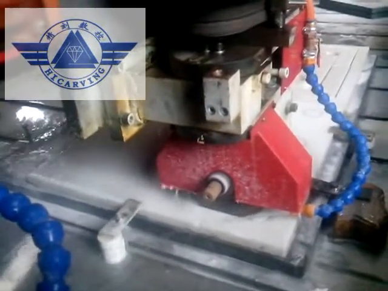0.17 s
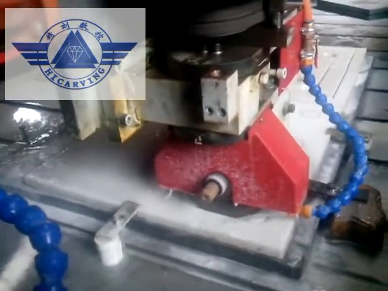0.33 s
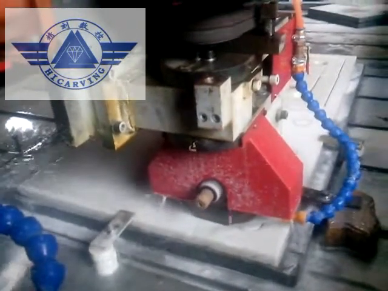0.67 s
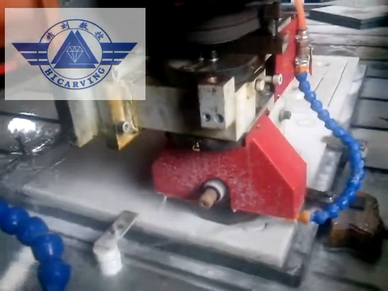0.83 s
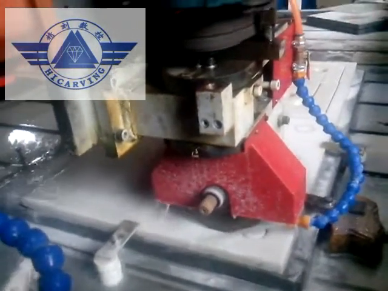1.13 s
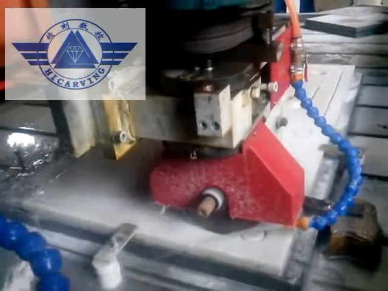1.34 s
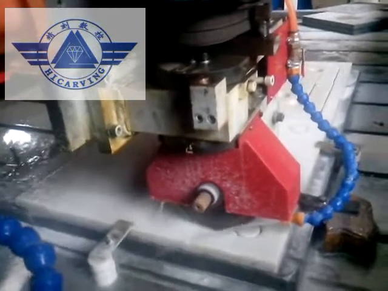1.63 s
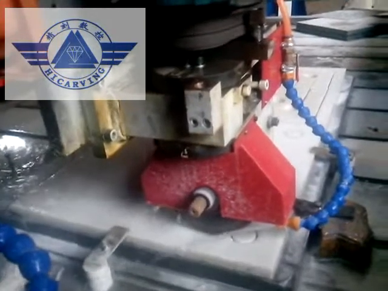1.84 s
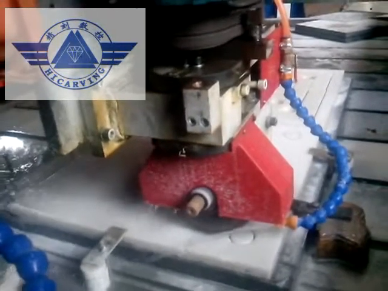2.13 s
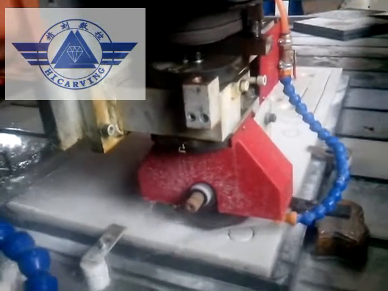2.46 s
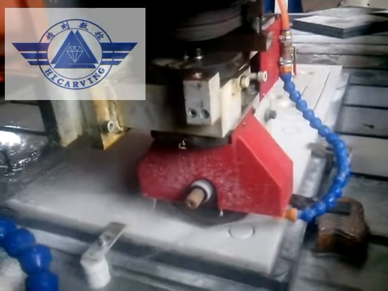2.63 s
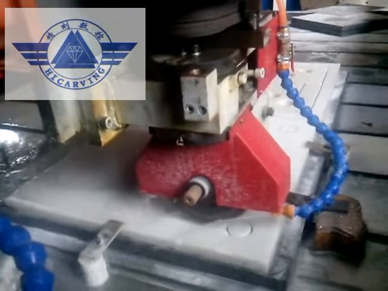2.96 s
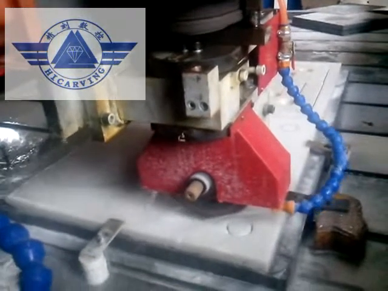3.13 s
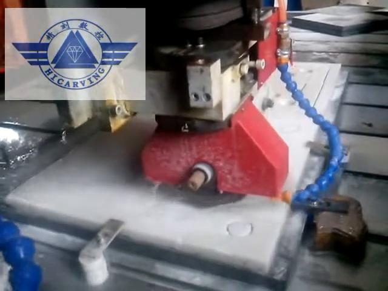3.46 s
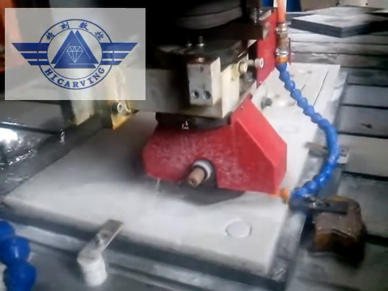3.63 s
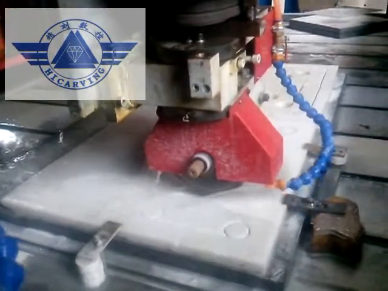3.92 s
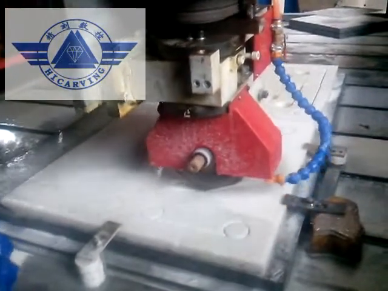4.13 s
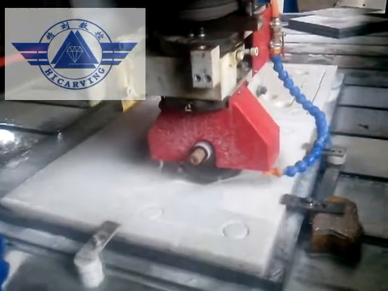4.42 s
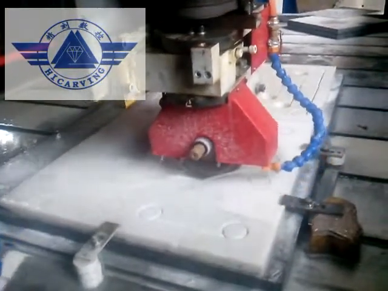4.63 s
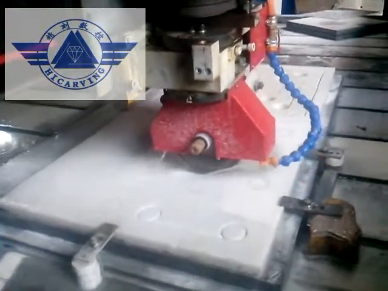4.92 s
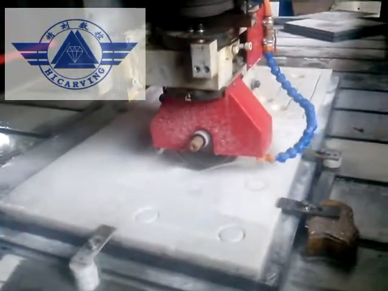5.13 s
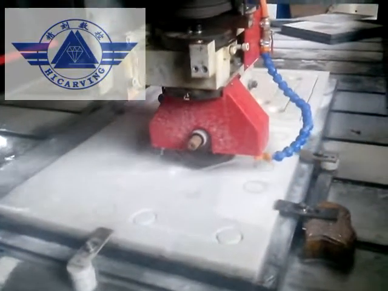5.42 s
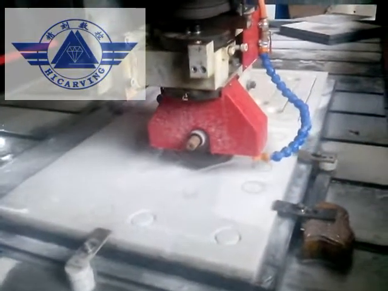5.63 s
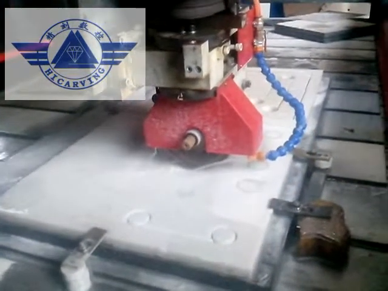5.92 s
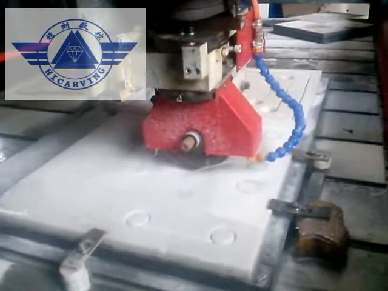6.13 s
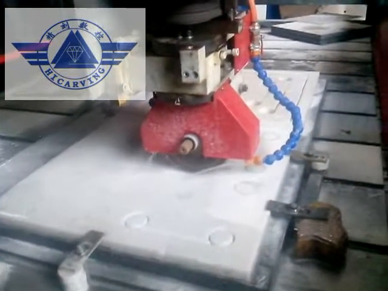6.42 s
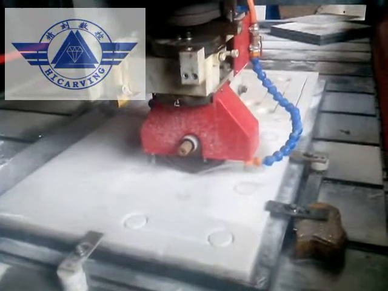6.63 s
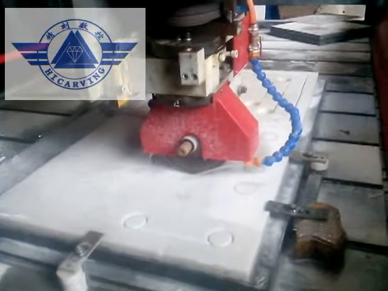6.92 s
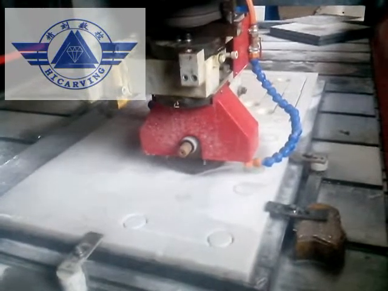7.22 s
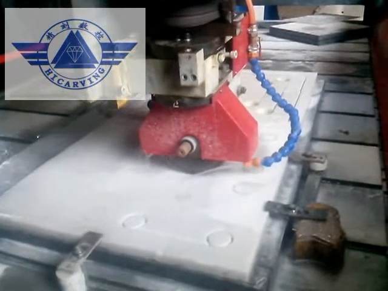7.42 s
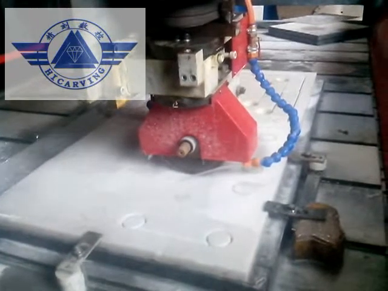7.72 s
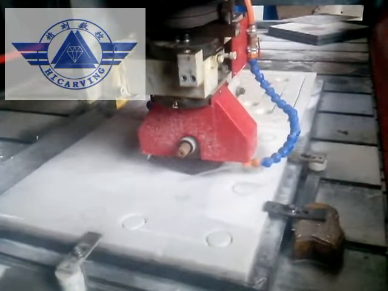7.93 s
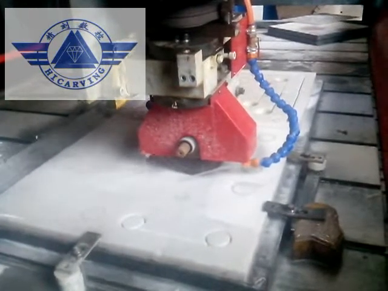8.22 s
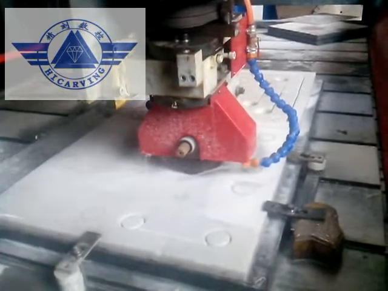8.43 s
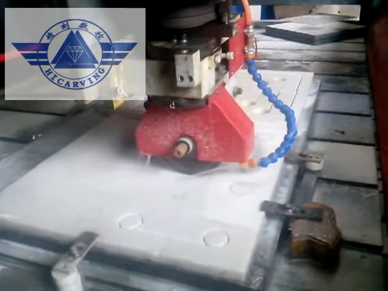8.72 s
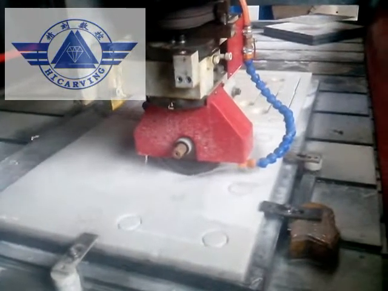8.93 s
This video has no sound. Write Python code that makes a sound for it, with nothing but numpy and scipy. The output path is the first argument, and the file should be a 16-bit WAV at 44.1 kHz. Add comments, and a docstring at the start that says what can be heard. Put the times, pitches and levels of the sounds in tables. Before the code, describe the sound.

In a workshop, a water-cooled circular saw blade rubs its kerf with bright, ringing scrapes about twenty-two times a second, screeching thinly. It thins out, then bites into a stone slab with a dense, rough grinding roar that grows brighter and more ringing, with chirps, snags and squeals. A few hard knocks end the cut and the loud pulsed scraping returns. Close, dry, overloaded microphone, centred.

```python
"""A blade scrapes and rings once a turn, then roars densely in stone, squeals and chirps, knocks hard and rubs again.
It is a water-cooled circular saw on a stone slab in a workshop; it runs free for a moment before it bites.
Grit and friction are noise, shaped by the turning rim, that drives the resonances of blade and slab;
squeals, screeches, whistles and whines are wavering tones; snags, knocks and chips are short bursts of noise;
water spray and a low hum in short spells are filtered noise behind them."""
import sys
import numpy as np
from scipy import signal
from scipy.fft import rfft, irfft
from scipy.io import wavfile
from scipy.ndimage import uniform_filter1d, map_coordinates

SR = 44100
rng = np.random.default_rng(int(sys.argv[2]) if len(sys.argv) > 2 else 0)


def master(y):
    """Save y as 16-bit WAV."""
    cut = np.clip(np.atleast_2d(y).T, -1, 1)
    pcm = np.round(cut * 32767)  # scale
    wavfile.write(sys.argv[1], SR, pcm.astype(np.int16))


N = 400428
TIME = np.arange(N) / SR
TAPS = 8192
HZ = np.fft.rfftfreq(TAPS, 1 / SR)

# the blade's rotation: turns a second, and a time at which a turn begins
TURN_HZ, TURN_FROM_S = 22.1, .0649
# the cut: the blade bites (with this time constant), sinks to full depth, leaves the stone
BITE_S, BITE_TIME_CONSTANT_S, SINK_FROM_S, SINK_TO_S, LEAVE_S = 1.832, 0.36, 2.98, 4.82, 7.84

# The feed surges at a steady rate: surges a second, and the time of one crest.
SURGE_RATE_HZ, SURGE_CREST_S = 2.82, 5.19
# Voices of the cut. Each holds: base level in dB biting in, base level in dB at full depth, swing with each
# surge in dB, gain when running free (negative inverts the wave), decay in dB per second after the cut.
RUMBLE = (-38, -36, 1.5, 0.07, 400)
GRIND = (-28.5, -25.5, 0.72, 0.12, 275.5)
RING = (-31.5, -25, 0, 0.23, 104)
HISS = (-35.5, -31, 0.5, -0.12, 128)


def cut_level(voice, depth):
    """Exponential onset: a voice builds as the blade bites, follows depth and feed, and decays on leaving."""
    early_db, deep_db, surge_db, free, fall_db_per_s = voice
    bite = 1 - np.exp(-np.maximum(TIME - BITE_S, 0) / BITE_TIME_CONSTANT_S)
    running_free = np.interp(TIME, [BITE_S - .25, BITE_S - .1], [0, free])
    surge = np.cos(2 * np.pi * SURGE_RATE_HZ * (TIME - SURGE_CREST_S))
    db = early_db + (deep_db - early_db) * depth + surge_db * surge
    db = db - fall_db_per_s * np.maximum(TIME - LEAVE_S, 0)
    return (bite + (1 - bite) * running_free) * amp(db)


# The ring keeps growing as the kerf lengthens, counted from full depth.
RING_GROWTH_DB_PER_S = 0.7
# Blade held in the cut, with slab and guard.
# Each row: frequency in Hz, half width in Hz, relative level in dB biting in, the same at full depth.
SLAB_MODES = [(146, 7.4, -12, -15), (222.3, 33, -7, -8), (301.2, 20, -0.5, -5.5), (383.4, 10, -3.5, -18.5),
              (526, 44, -10.5, -12.5), (590, 49, -3, -10), (712, 24, -14, -11.5), (925, 250, -10.5, -14),
              (955, 17, -0.5, -6), (1184, 62, -10, -16), (1417, 53, -7, -10.5), (1543, 38, -3, -10.5),
              (1686, 46, -6, -13.5), (1885, 196, -16, -11), (2024, 11, -2, -3), (2280, 120, -12.5, -14),
              (2490, 25, -3, -14.5), (2781, 111, -1.5, 1), (2896, 18, 4, 4.5), (3011, 62, -6.5, -4),
              (3230, 100, -12.5, -10), (3592, 38, -8, -8), (3910, 160, -12.5, -9), (4396, 125, -8.5, -2.5),
              (5030, 190, -9.5, -11.5), (5660, 180, -14, -16), (6040, 130, -23, -19),
              (6995, 120, -21.5, -24)]
# Broad colour of the cut: steep drop above 7 kHz, faint band near 9 kHz.
# Each row: frequency in Hz, spectrum level in dB on the scale of the slab modes.
CUT_COLOUR = [(20, -27.5), (65, -43), (110, -17), (500, -20), (6500, -20), (7300, -45.5), (7900, -77),
              (8500, -57.5), (9000, -40.5), (9700, -49), (10400, -66), (16000, -85)]
# Load on the blade while it works into the stone.
# Each row: time in seconds, change of rumble and grinding in dB.
LOAD = [(1.95, -0.5), (2.35, 2), (2.72, 0.5), (2.95, -2), (3.1, 0), (3.3, -2), (4.3, 0.5)]
# Hard patches in the stone add to the blade's ring.
# Each row: start in seconds, length in seconds, added ring in dB against the usual one.
HARD_PATCHES = [(2.42, .11, 3), (2.53, .2, -8), (7.31, .07, -2)]
# The loaded rim repeats its forces every turn.
# Each row: multiple of the turn rate, level in dB against the rumble.
ORDERS_OF_TURN = [(10, -12), (17, -13), (26, -10), (27, -7), (28, -8)]


def cutting(bite_at=0.15, bite=0.41, throb=0.26):
    """Forced vibration: grit crushing stone drives the held blade; the ring and hiss grow brighter with depth."""
    depth = np.interp(TIME, [SINK_FROM_S, SINK_TO_S], [0, 1])
    rumble, grind, rings, hiss = (cut_level(voice, depth) for voice in (RUMBLE, GRIND, RING, HISS))
    load_gain = amp(curves(LOAD)[0])
    rumble, grind = load_gain * rumble, load_gain * grind
    growth = amp(RING_GROWTH_DB_PER_S * np.maximum(TIME - SINK_TO_S, 0))
    rings = rings * growth * (1 + swells(HARD_PATCHES, edge=0.023))

    # the high spot bites once a turn
    spot = high_spot((TIME - TURN_FROM_S) * TURN_HZ - bite_at, rise=0.048, fall=0.049)
    load = (1 + throb * spot) * amp(.6 * wander(28) + .5 * wander(4))
    # fractures come in clumps
    crush = load * evened(patchy(patch_db=2.5, span_hz=125.0, life=0.11) * amp(2. * wander(410)))
    # now one mode is struck, now another
    chipped = load * patchy(patch_db=3.7, span_hz=110., life=.05)
    # larger chips ping the strong modes near 2.8 kHz
    chips = evened(chipped * (1 + bite * spot) * amp(2.2 * np.clip(wander(110), -2, 2)))

    early, late = (np.hypot(resonances(SLAB_MODES, axis=k), spectrum(CUT_COLOUR)) for k in range(2))
    voices = [(crush, zone(5, 444), rumble), (crush, zone(429, 2610), grind),
              (chips, zone(2500, 3570), rings), (crush, zone(3260, 20000), hiss)]
    out = np.zeros(N)
    for drive, band, level in voices:
        out += level * ((1 - depth) * ring(drive, band * early) + depth * ring(drive, band * late))
    for multiple, db in ORDERS_OF_TURN:
        phase = 2 * np.pi * multiple * TURN_HZ * TIME + .6 * wander(5)
        tone = np.sin(phase) * (1 + .5 * wander(8))
        out += rumble * amp(db) * evened(tone)
    return out


# The high spot bites extra hard and pings the modes near 2.8 kHz.
# Each row: time in seconds, relative level in dB.
PINGS = [(2.44, -15), (2.473, -12), (2.776, -14), (2.876, -15), (3.519, -14), (4.046, -13), (4.578, -9),
         (5.776, -10.5), (5.911, -6), (6.093, -8), (6.544, -5), (6.671, -9), (6.7705, -9), (7.0364, -8),
         (7.269, -24), (7.45, -17.5), (7.585, -9)]
# Lumps of stone break away with a dull crunch.
# Each row: time in seconds, relative level in dB.
CRUNCHES = [(2.774, -20), (2.872, -27.5), (6.665, -19)]


def chipping(ping_db=-4.0):
    """Impulse response: hard bites ring the held blade near 2.8 kHz; breaking lumps shake the slab as well."""
    ping_force = bursts(PINGS, rise=0.00094, decay=0.0069) * rng.standard_normal(N)
    pings = ring(ping_force, resonances(SLAB_MODES, axis=1) * zone(2590, 3180))
    crunch_force = bursts(CRUNCHES, rise=0.013, decay=0.015) * rng.standard_normal(N)
    crunches = ring(crunch_force, resonances(SLAB_MODES, axis=0) * zone(480, 4300))
    return amp(ping_db) * pings + crunches


# The three high spots of the rim. Each row: place in the turn, rise in turns, release in turns,
# creep of the place in turns per second.
SPOTS_BEFORE = [(.04, 0.12, 0.19, 0.04), (.45, 0.11, 0.27, .015), (.73, 0.052, 0.041, .005)]
SPOTS_AFTER = [(.062, 0.094, 0.15, -0.022), (.55, 0.073, 0.11, 0.045), (.745, .05, .06, .09)]
# The blade lifts before it bites, so its strokes shorten: from when, and the share of length left at the bite.
LIFT_S, LIFT_SHARE = 0.83, 0.78


def strokes_of_rim(after, second_db, third_db):
    """Periodic contact: each high spot presses on the kerf once a turn, with slight chance in time and force."""
    turns = (TIME - TURN_FROM_S) * TURN_HZ + 0.0064 * wander(28)
    age = TIME - after * LEAVE_S
    length = np.where(after, 1, np.interp(TIME, [LIFT_S, BITE_S], [1, LIFT_SHARE]))
    strokes = []
    for early, late, db in zip(SPOTS_BEFORE, SPOTS_AFTER, [0, second_db, third_db]):
        at, rise, fall, creep = (np.where(after, b, a) for a, b in zip(early, late))
        press = high_spot(turns - at - creep * age, rise * length, fall * length)
        strokes.append(amp(db + wander(43)) * press)
    return strokes


# Rubbing before and after the cut. Each row: time in seconds, base level of the ring in dB, base level of the
# low blade modes in dB, then second high spot, third high spot and steady contact in dB against the first spot.
RUB_BEFORE = [(0, -19, -24, -6, -19, -2), (.3, -16, -24, 0, -2, -27), (.42, -20, -28, -5.5, -12, -7),
              (.6, -15, -25.5, -2, -19, -21), (.8, -14, -22, 1.5, -13, -8), (.9, -15.5, -27.5, -10, 0, -6),
              (1.1, -16, -29.5, 2, 3, -9.5), (1.22, -16.5, -26.5, 4, 3, -10),
              (1.47, -17.5, -28.5, 3, -12, -18), (1.66, -21, -44, 2, -17, -29),
              (1.8, -39.5, -50, 1, 0, -10), (1.95, -46, -49, 2, 6, -5)]
RUB_AFTER = [(7.9, -22, -26.5, -31, -35, -36), (7.97, -19.5, -32.5, -19, -7, -20),
             (8.12, -20, -26, -4.5, 3, -10.5), (8.33, -20, -28, -10, -5, -12.5),
             (8.47, -16.5, -21.5, -9, -0.5, -13), (8.6, -15.5, -22.5, -1, 4.5, -16),
             (8.74, -18, -29, -14, 1, -4), (8.85, -16, -19.5, 2.5, 1.5, -14.5),
             (9.08, -14.5, -21.5, 1, 3, -7)]
# Turns on which the first high spot digs in harder.
# Each row: start in seconds, length in seconds, added force in dB against the usual one.
HARD_STROKES = [(.058, .016, -4), (.288, .014, 0), (.335, .013, 1), (.604, .016, -2), (.65, .014, -3),
                (1.257, .012, 2), (1.304, .012, -2), (1.395, .012, -2), (1.575, .014, -4),
                (8.026, .012, -1), (8.071, .014, 1)]
# Steel blade. Each row: frequency in Hz, half width in Hz, relative level in dB rubbing lightly,
# the same rubbing deeper, the same after the cut.
BLADE_MODES = [(1673, 34, -46, -33, -12.5), (1944, 59, -12.5, -9, -12.5), (2036, 100, -24, -36, -14),
               (2353, 49, -15.5, -18.5, -33), (2760, 450, -24, -30, -31), (2678, 23, -29, -26, -6),
               (2885, 110, -15, -9, -5.5), (3156, 32, -15, -11, -6), (3278, 30, -14, -7.5, 1.5),
               (3344, 57, -20, -25, -5.5), (3806, 20, -11.5, -14, -19), (3990, 130, -34, -23, -12.5),
               (4157, 61, -11.5, -23, -2), (4327, 103, -5, -8.5, -0.5), (4550, 76, -6, -5, -8),
               (4710, 42, 3.5, -7, -18), (4993, 63, 5, -2, 0), (5390, 70, -24, -8, -10.5),
               (5160, 85, 1.5, -10, -6.5), (5600, 51, -3, -2.5, -35), (5663, 51, -13, -2, 3.5),
               (5940, 89, -12, -1, -10), (5873, 88, 7.5, -6, -25), (6510, 72, -8, -2, -15),
               (6396, 43, -10, -6, -4.5), (6670, 39, -7, -15, -1), (6680, 36, -63, -20, -9)]
# Overall colour of the rubbing: steep drop above 7 kHz, faint band near 9.4 kHz.
# Each row: frequency in Hz, spectrum level in dB on the scale of the blade modes, before a small shift.
RUB_COLOUR = [(1000, -58.5), (6800, -19), (7300, -38), (7900, -80.5), (8700, -51.5), (9400, -29),
              (9800, -40), (10200, -47), (10800, -80), (16000, -74)]
# The contact slips deeper into the kerf and the ring changes colour.
SLIP_S, SLIP_TAKES_S = 0.81, 0.11


def rubbing(low_share=0.6):
    """Friction-driven modes: high spots scrape the kerf each turn, and the place of contact picks the modes."""
    ring_db, low_db, second_db, third_db, steady_db = curves(RUB_BEFORE + RUB_AFTER)
    after = TIME > (BITE_S + LEAVE_S) / 2  # the two rubs lie on either side of the cut
    first, second, third = strokes_of_rim(after, second_db, third_db)
    digging = 1 + swells(HARD_STROKES, edge=.004)
    lesser = np.sqrt(second ** 2 + third ** 2 + amp(steady_db) ** 2)

    # which column of BLADE_MODES rings; fractions blend two neighbours
    slipping = np.interp(TIME, [SLIP_S, SLIP_S + SLIP_TAKES_S, BITE_S], [0, 0.7, 1.4])
    place = np.where(after, 2, slipping)
    colours = [np.hypot(resonances(BLADE_MODES, axis=k), amp(shift_db) * spectrum(RUB_COLOUR))
               for k, shift_db in enumerate([0., 1.5, 1.5])]

    def scrape(force, band, singing=0):
        """Random excitation: friction noise under a contact force feeds the blade modes of one band."""
        force = force / np.sqrt(uniform_filter1d(force ** 2, round(2 * SR / TURN_HZ)))
        friction = patchy(patch_db=5., span_hz=160., life=.04, size=1024)  # feeds now one mode, now another
        drive = force * evened(friction * amp(2.4 * wander(520)))  # single grains catch
        rasp = sum(np.maximum(1 - abs(place - k), 0) * ring(drive, band * c) for k, c in enumerate(colours))
        return held(swayed(rasp) + singing * force, force)

    high = scrape(np.hypot(first * digging, lesser), zone(3330, 22000), singing=screech() * digging)
    # the low modes answer mostly the first spot
    low = scrape(np.hypot(first, low_share * lesser), zone(1460, 3680))
    contact = during(RUB_BEFORE) + during(RUB_AFTER)
    return contact * (amp(ring_db) * high + amp(low_db) * low + water_spray(first, low_db, after))


# The rubbing locks onto one high mode and screeches.
# Each row: start in seconds, length in seconds, frequency in Hz, level in dB against the ring.
SCREECHES = [(.27, 0.43, 5880, -4), (0.514, 0.26, 5020, -9), (.55, 0.36, 5250, -17), (0.622, .11, 6200, -9),
             (0.8, .45, 5830, -12), (1.374, 0.44, 6430, -3), (8.3, 1, 6480, -12)]


def screech():
    """Stick-slip oscillation: friction keeps single modes singing, each wavering in pitch."""
    return sum(chatter([(s, length, db)], hz, level_db=0., edge=.08, waver_hz=28., rough=.3)
               for s, length, hz, db in SCREECHES)


# Hard knocks of the blade against the stone. Each row: time in seconds, relative level in dB.
KNOCKS = [(7.757, -35), (7.799, -4.5), (7.845, -2), (7.891, -16)]


def knocks(rim_db=9.5):
    """Impact excitation: a high spot strikes the stone and the blade rings, most of all its rim near 4.2 kHz."""
    # rim modes: frequency in Hz, half width in Hz, relative level in dB
    rim = amp(rim_db) * resonances([(4150, 59, 6), (2850, 72, -2), (5740, 100, -1.0)])
    light, left = resonances(BLADE_MODES, axis=0), resonances(BLADE_MODES, axis=2)
    colour = np.sqrt(light ** 2 + left ** 2 + rim ** 2)
    force = bursts(KNOCKS, rise=0.0028, decay=0.011) * rng.standard_normal(N)
    return ring(force, colour * zone(1300, 9800))


# The rim snags on the kerf. Each row: time in seconds, relative level in dB.
SNAGS = [(2.4734, -25.5), (2.8789, -28), (3.512, -19.5), (3.605, -21.5), (3.919, -21.5), (4.148, -20.5),
         (4.5083, -17), (4.5567, -16), (4.827, -14.5), (4.873, -15), (4.9192, -27), (5.96, -14.5),
         (6.3647, -15.5), (6.6368, -13), (6.6715, -11), (7.0887, -13.5), (7.3163, -14), (7.4061, -20),
         (7.4994, -20)]
# The rim's modes when it snags. Each row: frequency in Hz, half width in Hz, relative level in dB.
SNAG_MODES = [(2790, 190, -4), (3580, 140, -10.5), (4040, 150, 1), (4393, 137, 5.5), (4800, 220, -13),
              (5610, 200, -11), (7020, 130, -26.5)]


def snags(level_db=-3.0, tail_db=-0.5):
    """Transient excitation: the rim catches with a snap and rings near 4 kHz, each time favouring other modes."""
    snap = bursts(SNAGS, rise=0.0022, decay=0.0025)
    tail = bursts(SNAGS, rise=0.0028, decay=0.023)
    grit = patchy(patch_db=3., span_hz=260., life=.06) * amp(2 * wander(500))
    return amp(level_db) * ring((snap + amp(tail_db) * tail) * grit, resonances(SNAG_MODES))


SQUEAL_HZ = 966
# Squeals, when the blade chatters in one mode.
# Each row: start in seconds, length in seconds, relative level in dB.
SQUEALS = [(4.042, 0.032, -27.5), (4.12, 0.046, -27.5), (4.316, 0.16, -23), (4.572, 0.12, -27.5),
           (4.759, 0.072, -21.5), (4.86, 0.11, -34.5), (5.035, 0.094, -26), (5.11, 0.17, -24),
           (5.439, 0.089, -24), (5.855, 0.074, -31), (6.16, 0.024, -28), (6.21, 0.041, -24),
           (6.561, 0.079, -27), (6.852, 0.02, -25.5), (6.93, 0.079, -30.5), (7.236, 0.076, -29),
           (7.52, 0.039, -23.5), (7.652, 0.06, -28)]


def squeals(rasp_db=-7.0, rasp_width_hz=180.0):
    """Self-excited vibration: the blade chatters in its low mode and rasps the stone while it does."""
    tone = chatter(SQUEALS, SQUEAL_HZ, level_db=-0.5, edge=0.024, waver_hz=8.0, rough=0.18)
    # rasp modes: frequency in Hz, half width in Hz, relative level in dB
    rasp = ring(rng.standard_normal(N), resonances([(SQUEAL_HZ, rasp_width_hz, 0), (1460, 70, -2)]))
    return tone + amp(rasp_db) * swells(SQUEALS, edge=0.037) * rasp


WHISTLE_HZ = 2060
# Thinner whistles of a higher mode.
# Each row: start in seconds, length in seconds, relative level in dB.
WHISTLES = [(2.04, 0.71, -32), (3.61, 0.18, -26), (5.95, 0.79, -31.5)]


def whistles():
    """Self-excited vibration of a higher mode: a thin tone, wavering in pitch and strength."""
    return chatter(WHISTLES, WHISTLE_HZ, level_db=-9.5, edge=0.11, waver_hz=9.06, rough=0.56)


# Short gliding whines. Each row: start in seconds, length in seconds, first frequency in Hz,
# last frequency in Hz, relative level in dB.
WHINES = [(3.042, 0.053, 1570, 1550, -27), (3.101, 0.09, 1233, 942, -29), (5.727, 0.03, 3700, 3170, -24),
          (5.866, 0.052, 947, 875, -27), (6.154, 0.08, 1170, 1073, -28), (6.226, 0.12, 934, 1187, -25),
          (6.53, 0.048, 1100, 1185, -27), (7.628, 0.054, 1680, 1750, -25.5)]


def whines():
    """Frequency glide: rough tones swell and fade as they slide through the roar."""
    out, waver_hz = np.zeros(N), 27 * wander(80)
    for s, length, first_hz, last_hz, db in WHINES:
        part = np.clip((TIME - s) / length, 0, 1)
        hz = first_hz + (last_hz - first_hz) * part + waver_hz
        tone = evened(np.sin(2 * np.pi * np.cumsum(hz) / SR))
        out += amp(db) * np.sqrt(abs(np.sin(np.pi * part))) * tone
    return out * evened(1 + .55 * wander(70))


# Base levels before and after the cut in dB, and the share of the low modes' dB that is added to them.
SPRAY_BEFORE_DB, SPRAY_AFTER_DB, SPRAY_FOLLOWS = -27, -30.5, 0.64
# Water spray. Each row: frequency in Hz, relative spectrum level in dB.
SPRAY_SPECTRUM = [(25, -12), (120, -19), (420, -10.5), (585, 13), (650, 8.5), (750, 19.5), (1080, 11.5),
                  (1350, 13), (1800, 10), (5000, -29)]


def water_spray(first, low_db, after):
    """Broadband noise, amplitude-modulated: water thrown off the rim swells with the first high spot."""
    splashing = patchy(patch_db=2.8, span_hz=170., life=0.16) * (1 + .5 * first)
    water_db = np.where(after, SPRAY_AFTER_DB, SPRAY_BEFORE_DB) + SPRAY_FOLLOWS * low_db
    return amp(water_db) * ring(splashing, spectrum(SPRAY_SPECTRUM))


# Low hum. Each row: frequency in Hz, half width in Hz, relative level in dB.
HUM_MODES = [(226, 67, -10), (299.6, 19, 6), (603, 21, 8.5)]
# Spells of the hum. Each row: start in seconds, length in seconds, level in dB.
HUM_SPELLS = [(0, 0.17, -44), (.2, 0.45, -52.5), (.7, 0.075, -48), (1.02, 0.069, -55), (1.22, 0.29, -54),
              (1.64, 0.28, -63), (7.85, 0.21, -54.5), (8.93, 0.11, -56)]


def low_hum():
    """Narrow-band noise: a low hum, heard only in the listed spells."""
    return swells(HUM_SPELLS, edge=0.022) * ring(rng.standard_normal(N), resonances(HUM_MODES))


def chatter(rows, hz, level_db, edge, waver_hz, rough):
    """Mode locking: one blade mode locks into a wavering, broken tone for a moment."""
    phase = 2 * np.pi * np.cumsum(hz + waver_hz * wander(43.2)) / SR
    return amp(level_db) * swells(rows, edge) * evened(np.sin(phase) * (1 + rough * wander(45)))


def high_spot(turns, rise, fall):
    """Gaussian pulse of contact force once a turn: rise and release widths are in turns."""
    offset = (turns + .5) % 1 - .5
    return np.exp(-(offset / np.where(offset < 0, rise, fall)) ** 2)


def held(x, force):
    """Friction feeds or damps the ringing, drawing each stroke's swing towards the contact force."""
    def power(v):
        """Short-term mean square."""
        return uniform_filter1d(uniform_filter1d(v ** 2, 400), 400) + 1e-6
    keep = np.exp(-1 / (.002 * SR))  # the steel rings on with a time constant of 2 ms
    swing = signal.lfilter([1 - keep], [1, -keep], force)
    return x * (power(swing) / power(x)) ** .37


def swayed(x, sway_s=0.000156):
    """Varying delay: the ring's pitch sways a little from stroke to stroke as the blade flexes."""
    return map_coordinates(x, [(TIME + sway_s * wander(11.4)) * SR], order=5, mode="nearest")


def softly_limited(x, limit):
    """Amplitude saturation: peaks of the swing are softly limited."""
    swing = uniform_filter1d(abs(signal.hilbert(x)), 16)
    return x / (1 + (swing / limit) ** 6) ** (1 / 6)


def ring(drive, gain):
    """Minimum-phase response of unit energy: the body rings on after what strikes it."""
    log_gain = np.log(np.maximum(gain, 1e-5))
    causal = np.exp(np.conj(signal.hilbert(np.r_[log_gain, log_gain[-2:0:-1]])))
    response = np.fft.ifft(causal).real[:TAPS // 2]
    return signal.oaconvolve(drive, response / np.linalg.norm(response))[:N]


def resonances(modes, axis=0):
    """Modal superposition: gain per bin, dying out above about 7 kHz; axis picks the column of levels."""
    hz, width, *levels = np.transpose(modes)[:, :, None]
    peaks = np.linalg.norm(amp(levels[axis]) / (1 + ((HZ - hz) / width) ** 2), axis=0)
    return peaks * zone(1, 7400)


def spectrum(points):
    """Spectral envelope: gain per bin from (Hz, dB) points, interpolated over log frequency."""
    f, db = np.transpose(points)
    return amp(np.interp(np.log(HZ + 1), np.log(f), db))


def zone(lo_hz, hi_hz, order=24):
    """Band-pass: gain per bin with steep edges."""
    return 1 / np.sqrt((1 + (lo_hz / (HZ + 1)) ** order) * (1 + (HZ / hi_hz) ** order))


def patchy(patch_db, span_hz, life, size=2048):
    """Non-stationary noise: stretches of pitch swell and fade by chance; life in seconds."""
    hz, t, z = signal.stft(rng.standard_normal(N), SR, nperseg=size)
    field = rng.standard_normal(z.shape)
    across, along = np.fft.fftfreq(len(hz), hz[1])[:, None], np.fft.fftfreq(len(t), t[1])
    smoothing = np.exp(-(across * span_hz) ** 2 - (along * life) ** 2)
    field = np.fft.ifft2(np.fft.fft2(field) * smoothing).real
    gain = amp(patch_db * np.clip(evened(field), -2, 1.5))
    return evened(signal.istft(z * gain, SR, nperseg=size)[1][:N])


def wander(rate_hz):
    """Low-pass noise: chance variation of rms 1, slower than about the given rate."""
    f = np.fft.rfftfreq(N, 1 / SR)
    return evened(irfft(rfft(rng.standard_normal(N)) * np.exp(-(f / rate_hz) ** 2), N))


def bursts(rows, rise, decay):
    """Exponential decay: envelope of short blows from rows (s, dB); rise and decay in seconds."""
    out = np.zeros(N)
    for s, db in rows:
        age = np.maximum(TIME - s, 0)
        out += amp(db) * np.minimum(age / rise, 1) ** 2 * np.exp(-np.maximum(age - rise, 0) / decay)
    return out


def swells(rows, edge):
    """Gating: envelope of held sounds from rows (start s, length s, dB), with edges of the given seconds."""
    return sum(amp(db) * np.clip(np.minimum(TIME - s, s + length - TIME) / edge + .5, 0, 1)
               for s, length, db in rows)


def during(rows, fade=0.2):
    """Gating: 1 while a table lasts, with short fades outside."""
    start, end = rows[0][0], rows[-1][0]
    return np.interp(TIME, [start - fade, start, end, end + fade], [0, 1, 1, 0])


def curves(rows):
    """Linear interpolation: each column of a table at every sample."""
    s, *columns = np.transpose(rows)
    return [np.interp(TIME, s, c) for c in columns]


def evened(x):
    """Normalisation: scales to rms 1."""
    return x / np.sqrt(np.mean(x ** 2) + 1e-20)


def amp(db):
    """Logarithmic level: decibels to gain."""
    return 10 ** (np.asarray(db) / 20)


def scene():
    """Superposition: all sources reach one microphone, heard alike in both channels."""
    scraping = softly_limited(rubbing() + snags(), limit=.78)
    blade = softly_limited(scraping + knocks(), limit=1.02)
    mono = cutting() + chipping() + blade + squeals() + whistles() + whines() + low_hum()
    return np.array([mono, mono])


def record(dry):
    """Overload and band limit: peaks beyond full scale clip, then a low-pass removes the extreme top."""
    clipped = np.clip(dry, -1, 1)
    low_pass = signal.firwin(511, 15800, window=("kaiser", 9), fs=SR)  # edge in Hz
    return signal.oaconvolve(clipped, low_pass[None], "same")


dry = scene()
out = record(dry)
master(out)
```